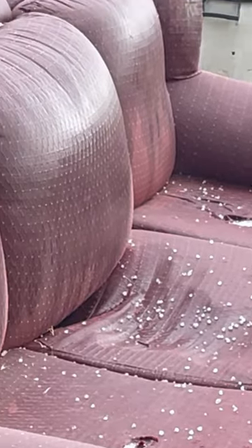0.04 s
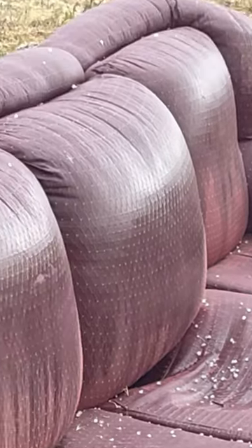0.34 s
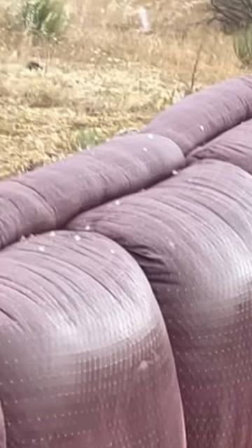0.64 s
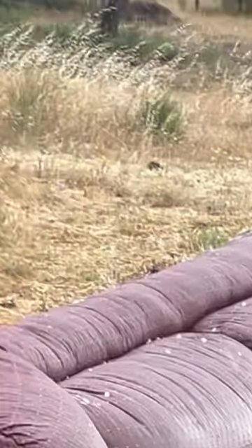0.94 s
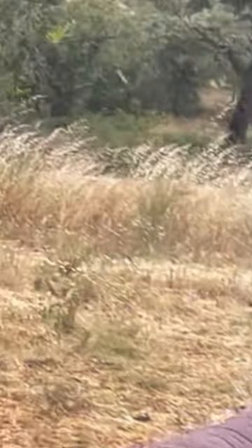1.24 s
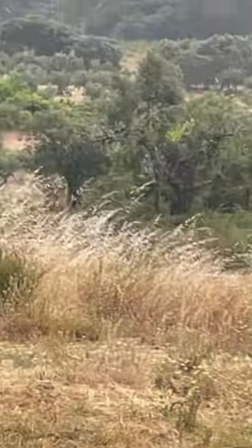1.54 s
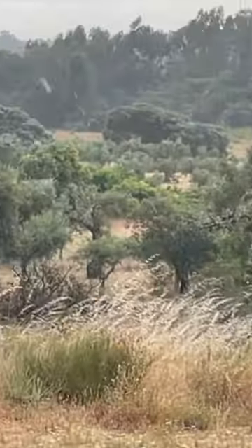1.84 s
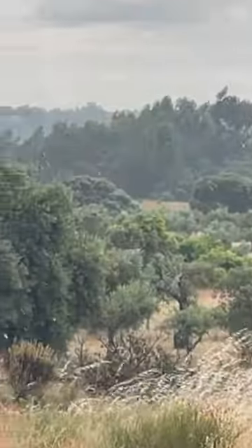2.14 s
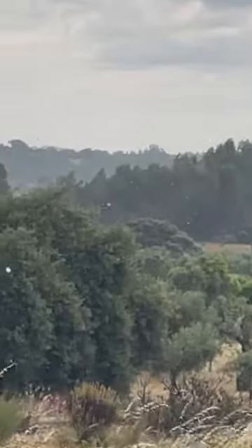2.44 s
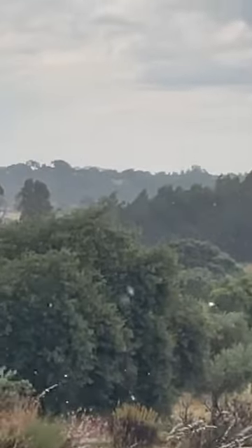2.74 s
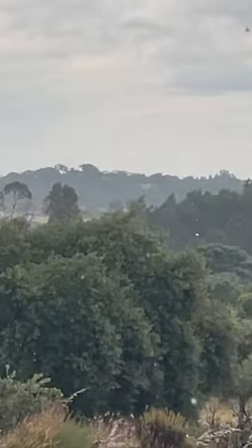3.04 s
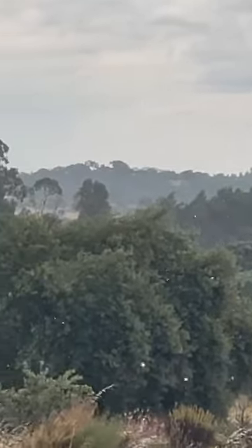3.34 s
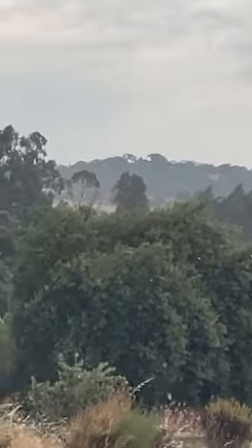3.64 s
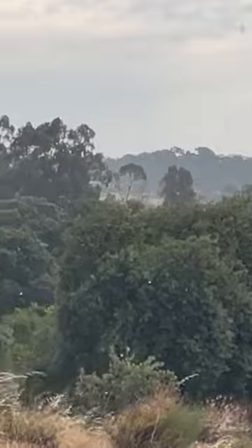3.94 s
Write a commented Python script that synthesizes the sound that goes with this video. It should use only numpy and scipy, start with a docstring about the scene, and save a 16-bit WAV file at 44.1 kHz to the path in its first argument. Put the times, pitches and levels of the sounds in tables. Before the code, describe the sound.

Hail and rain fall on dry ground and a sofa, clicking and knocking up close.

```python
"""Hail and rain beside an old sofa

Hail and rain fall on dry ground, shrubs and a padded sofa, heard from a phone held beside it.
Close stones click and scatter, and a few ring on something hard; others knock on a taut sheet
to the left or thud into the cushions. Behind them the impacts of the whole field merge into
a dense patter, and a little wind rumbles on the microphone."""
import sys
import numpy as np
from scipy import signal
from scipy.fft import rfft, irfft
from scipy.io import wavfile
from scipy.ndimage import uniform_filter1d

SR = 44100
rng = np.random.default_rng(int(sys.argv[2]) if len(sys.argv) > 2 else 0)


def store_pcm(level_fs):
    """Save levels as 16-bit WAV."""
    pcm = np.round(np.clip(level_fs, -1, 1) * 32767).astype(np.int16)
    wavfile.write(sys.argv[1], SR, np.atleast_2d(pcm).T)


N = 176400
TIME, AGE = np.arange(N) / SR, np.arange(12288) / SR  # s into the scene; s since an impact
SCENE_HZ, IMPACT_HZ = (np.fft.rfftfreq(len(t), 1 / SR) for t in (TIME, AGE))


def undb(db):
    """Amplitude ratio of a level in decibels."""
    return 10 ** (np.asarray(db) / 20)


def on_log(hz, points):
    """Interpolation of (f/Hz, value) points on a logarithmic frequency axis."""
    knots_hz, values = np.array(points, float).T
    return np.interp(np.log(hz + 1), np.log(knots_hz), values)


def band(centre_hz, width_hz):
    """Resonance: a peak of gain with steep skirts."""
    detuning = (IMPACT_HZ ** 2 - centre_hz ** 2) / ((IMPACT_HZ + 1) * width_hz)
    return 1 / (1 + detuning ** 2 / 2)


# Coherence of the two channels: f/Hz, correlation coefficient
COHERENCE = [(100, .96), (330, .8), (600, .45), (1200, .3), (2100, .2), (2700, .65), (3600, 1)]

def noise(gain):
    """Partial coherence: coloured stereo noise of unit rms, most alike in bass and treble."""
    size = 2 * (len(gain) - 1)
    coherence = on_log(np.fft.rfftfreq(size, 1 / SR), COHERENCE)
    mid, side = rfft(rng.standard_normal((2, size))) * gain * np.sqrt([1 + coherence, 1 - coherence])
    y = irfft(np.array([mid + side, mid - side]))
    return y / y.std()


def fade(t60):
    """Damping: exponential decay by 60 dB in t60 seconds."""
    return np.exp(-np.log(1000) * AGE / t60)


def burst(gain, envelope):
    """Noise transient: each channel carries, on average, the energy of the envelope."""
    y = noise(gain) * envelope
    return y * np.sqrt(2 * np.sum(envelope ** 2) / np.sum(y ** 2))


def ring(hz, t60, sag, phase_spread):
    """Damped vibration of a struck skin: the pitch glides down through hz; phase differs by channel."""
    envelope = (1 - np.exp(-(AGE / .001) ** 2)) * fade(t60)
    phase = 2 * np.pi * np.cumsum(hz * (1 + sag * (fade(t60) - .5))) / SR
    offset = phase_spread * rng.standard_normal((2, 1))
    return np.sqrt(2) * envelope / envelope.max() * np.sin(phase + offset)


def flutter(per_s, size=len(AGE)):
    """Random modulation: ramps between random values, with unit standard deviation."""
    hold = int(SR / per_s)
    steps = np.repeat(rng.standard_normal(size // hold + 2), hold)
    y = uniform_filter1d(steps, hold)[rng.integers(hold):][:size]
    return y / y.std()


def arrivals(per_s):
    """Independent impacts, 600 at most: rows of t/s and three bounded normal deviates."""
    times = rng.uniform(0, N / SR, size=600)
    deviates = rng.standard_normal((600, 3)).clip(-2, 2)
    return np.column_stack([times, deviates])[:int(per_s * N / SR)]


def leftward(db):
    """Level difference: a source on the left is weaker in the right channel."""
    return undb([[0], [-db]])


def add(out, start_s, sound):
    """Superposition of a sound from its onset."""
    i = int(start_s * SR)
    out[:, i:i + sound.shape[-1]] += sound[:, :N - i]


# Spectrum of the rumble: f/Hz, relative level/dB
WIND_SPECTRUM = [(20, -26), (48, -3), (85, -4), (170, -16), (500, -58)]
# Gusts: t/s, level/dB, 1/e half-width/s
WIND_GUSTS = [(0.99, -48, 0.052), (2.11, -40, 0.024), (2.287, -40, 0.037), (3.748, -45.5, 0.44)]

def wind():
    """Turbulence: a breeze on the microphone gives a steady rumble and a few puffs."""
    gusts = sum(undb(db) * np.exp(-((TIME - s) / width) ** 2) for s, db, width in WIND_GUSTS)
    return noise(undb(on_log(SCENE_HZ, WIND_SPECTRUM))) * (undb(-53) + gusts)


# Spectrum of the far patter: f/Hz, relative spectral level/dB
PATTER_SPECTRUM = [(60, -11), (130, -4), (240, 0.5), (380, -2), (650, -2), (1000, -3), (1500, -6.5),
                   (2300, -4.5), (3100, -14), (4200, -17), (7000, -17.5), (10000, -25.5), (13000, -28.5),
                   (16000, -32)]
# Strength of the shower: t/s, relative patter level/dB, relative hiss level/dB
SHOWER_LEVELS = [(0,2,0.5), (.55,-1.5,-3.5), (1,1,0.5), (1.18,-3.5,-7), (1.35,0,4.5), (1.7,2.5,2.5),
                 (2.3,0,-0.5), (2.68,-2,3), (2.8,3,5.5), (3.12,-2,-0.5), (3.6,2.5,0)]

def far_patter():
    """Incoherent summation: countless far impacts form a wash whose octaves swell and flicker."""
    out, power = 0, 0
    swell_db = flutter(14, N)  # common to all octaves
    colour = undb(on_log(SCENE_HZ, PATTER_SPECTRUM))
    times, *levels = np.array(SHOWER_LEVELS).T
    patter_db, hiss_db = (np.interp(TIME, times, db) for db in levels)
    for octave in range(6, 15):
        gain = colour * np.sqrt(np.clip(1 - abs(np.log2(SCENE_HZ + 1) - octave), 0, 1))
        pan = leftward(on_log(2 ** octave, [(60, 0), (500, 4), (2000, 4), (4000, 0)]))
        hiss_share = on_log(2 ** octave, [(2000, 0), (4000, 1)])
        wash = noise(gain) * np.linalg.norm(gain) * pan
        wash *= undb(swell_db + 3 * flutter(70, N))  # each octave flickers on its own
        out += wash * undb(patter_db + hiss_share * (hiss_db - patter_db))
        power += wash.var()
    return out * undb(-35) / np.sqrt(power)


# Stones on something hard: t/s, f/Hz, level/dB, T60/s
HARD_STRIKES = [(.158,4400,-34,.06), (1.256,4700,-35,0.081), (1.257,12500,-40.5,.14),
                (3.243,7000,-20.5,0.12), (3.633,7300,-19.5,0.072)]

def pings():
    """Resonance: a hard object struck by a stone rings briefly in a narrow, high band."""
    out = np.zeros((2, N))
    for s, hz, db, t60 in HARD_STRIKES:
        add(out, s, undb(db) * burst(band(hz, width_hz=430), fade(t60)))
    return out


# Heavy stones on the cushions: t/s, f/Hz, thud level/dB, shudder level/dB, shudder T60/s
CUSHION_STRIKES = [(.829,296,-33.5,-27.5,0.22), (.876,312,-28,-37,.1), (1.152,366,-26.5,-39,0.068),
                   (2.0481,411,-21,-33,0.26), (2.71,454,-30,-38,.1), (3.62,443,-36,-24,0.22),
                   (3.662,280,-26.5,-31,0.55), (3.901,533,-21.5,-28,0.097)]

def cushions():
    """Damped vibration: the padding thuds and shudders under heavy stones; light ones pat its cover."""
    out = np.zeros((2, N))
    thud_t60, sag = .05, .43
    for s, hz, thud_db, shudder_db, t60 in CUSHION_STRIKES:
        shudder = burst(band(hz, width_hz=.62 * hz), fade(t60) * (1 - fade(thud_t60)))
        thud = ring(hz, thud_t60, sag, phase_spread=.43)
        add(out, s, undb(thud_db) * thud + undb(shudder_db) * shudder)
    for s, force, pitch, _ in arrivals(per_s=45):
        pat = ring(hz=649 * 2 ** (.717 * pitch), t60=.028 * 2 ** (-.5 * pitch), sag=sag, phase_spread=.93)
        add(out, s, undb(-39.5 + 3.7 * force) * pat)
    return out * leftward(2.1)


# Stones on the taut sheet: t/s, f/Hz, relative crack level/dB, relative rattle level/dB
SHEET_STRIKES = [(.073,2180,-31,-37), (.267,2230,-33,-33), (.418,2030,-28.5,-34.5), (.618,2120,-24,-37.5),
                 (.73,2240,-29,-36.5), (.833,2060,-24,-32), (.875,1830,-19.5,-45), (.961,2420,-29,-33),
                 (1.006,2260,-36,-31), (1.151,2270,-23.5,-39), (1.294,1480,-26.5,-34.5),
                 (1.724,2170,-24,-31.5), (2.094,2300,-39,-34), (2.299,1830,-38,-32.5),
                 (2.416,1996,-17,-30.5), (2.707,2420,-34,-38), (3.2,2200,-34,-30), (3.4115,2000,-24.5,-34),
                 (3.557,2230,-22,-37), (3.9613,2300,-24,-31.5)]

def sheet_knocks():
    """Membrane vibration: the sheet cracks where hit, rattles as the stone bounces and thumps as a whole."""
    out = np.zeros((2, N))
    sheet_hz, crack_t60 = 2246, .014
    small = [(s, sheet_hz * 2 ** (.213 * pitch), -44.5 + 3 * force, -50 + 2 * (force + bounce))
             for s, force, bounce, pitch in arrivals(per_s=36)]
    for s, hz, crack_db, rattle_db in list(SHEET_STRIKES) + small:
        smack = undb(-5) * burst(band(hz, width_hz=860), fade(.027))
        crack = undb(crack_db + 1) * (ring(hz, crack_t60, sag=.18, phase_spread=1) + smack)
        bounces = undb(5 * flutter(per_s=212).clip(-2, 2))
        bounces /= np.sqrt(np.mean(bounces ** 2))
        rattle_band = band((sheet_hz + hz) / 2, width_hz=380)
        rattle = undb(rattle_db + 4.5) * burst(rattle_band, fade(.21) * bounces)
        thump = undb(rattle_db) * burst(band(390, width_hz=690), fade(.12) * (1 - fade(crack_t60)))
        add(out, s, crack * leftward(10) + rattle * leftward(5) + thump * leftward(4))
    return out


# Spectrum of a stone on the ground: f/Hz, relative spectral level/dB
STONE_SPECTRUM = [(600, -20), (1900, -1), (3200, -1), (5000, -1.5), (7200, 4.5), (10000, 0.5),
                  (13000, -3.5), (16000, 1.5)]
# Close stones: t/s, relative click level/dB, relative scatter level/dB, treble gain/dB
GROUND_STRIKES = [(.1523,-41,-35,8), (.259,-40,-37.5,-6.5), (.331,-32,-51,-5), (.5517,-20.5,-45,-27),
                  (.672,-32.5,-58,-2), (.7676,-27,-48.5,0), (.8607,-31.5,-47,2), (1.0265,-42,-39.5,-8),
                  (1.0934,-36,-61,3), (1.1345,-35.5,-63,11), (1.2264,-35,-38,-13), (1.3351,-37,-31.5,5),
                  (1.4942,-27,-39,0), (1.5912,-28,-33,-20), (1.6498,-39,-34,0), (1.9939,-26.5,-41,-9),
                  (2.1649,-23.5,-38.5,-4), (2.2553,-24.5,-56,-7), (2.5027,-24.5,-45.5,-4),
                  (2.7677,-44,-35,-3.5), (2.9423,-47,-35.5,-2.5), (3.2436,-30,-37,1), (3.6325,-35,-38.5,-1)]

def ground_ticks():
    """Impulse excitation: each stone clicks with its own resonances, then chips and spray scatter."""
    out = np.zeros((2, N))
    knots_hz = np.arange(0, SR / 2, 190)
    contact = (1 - np.exp(-(AGE / .00083) ** 4)) * fade(.012)
    small = [(s, -43.5 + 4.5 * force, -55.5 + 4.5 * spray, 1 + 6 * brightness)
             for s, force, spray, brightness in arrivals(per_s=47)]
    for s, click_db, scatter_db, treble_db in list(GROUND_STRIKES) + small:
        resonances_db = 2.4 * np.interp(IMPACT_HZ, knots_hz, rng.standard_normal(len(knots_hz)))
        shelf_db = treble_db * on_log(IMPACT_HZ, [(4500, 0), (11500, 1)])
        colour = undb(on_log(IMPACT_HZ, STONE_SPECTRUM) + resonances_db + shelf_db)
        grain = undb(1.5 * flutter(per_s=900))
        click = undb(click_db + 4.5) * burst(colour, contact / contact.max())
        scatter = undb(scatter_db + 6) * burst(colour, grain * fade(.26))
        add(out, s, click + scatter)
    return out


def scene():
    """Superposition of the far shower, the wind and the close impacts."""
    return far_patter() + wind() + pings() + cushions() + sheet_knocks() + ground_ticks()


# Phase lag of the right channel: f/Hz, lag/rad
RIGHT_LAG = [(250, 0), (600, 1.8), (1200, 2.9), (2000, 2.6), (2800, 0), (5000, 0), (6200, -1.4),
             (6900, -3.1), (8700, -3.1), (9400, -2.2), (10400, 0), (12300, .2), (13700, 3)]

def record(dry):
    """Phase shift and band limit: the phone's channels differ in phase, and the top is cut."""
    right = irfft(rfft(dry[1]) * np.exp(-1j * on_log(SCENE_HZ, RIGHT_LAG)), N)
    low_pass = signal.ellip(10, .2, 80, 15800, fs=SR, output="sos")
    return signal.sosfilt(low_pass, np.array([dry[0], right]))


dry = scene()
out = record(dry)
store_pcm(out)
```